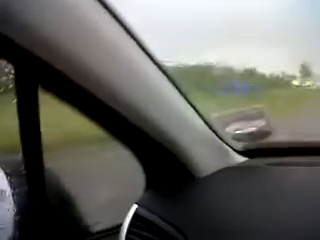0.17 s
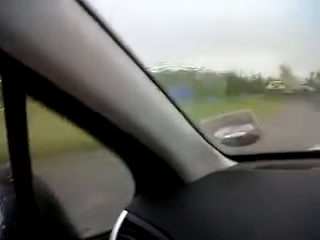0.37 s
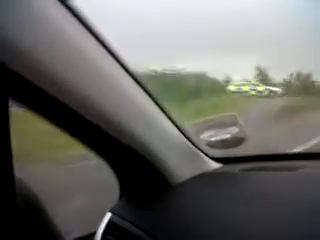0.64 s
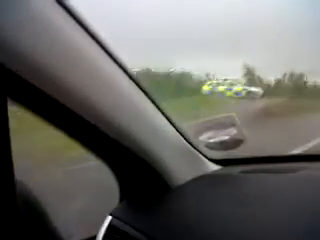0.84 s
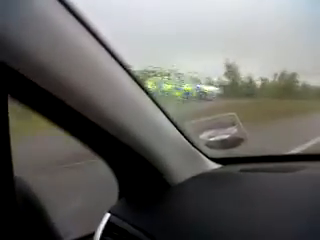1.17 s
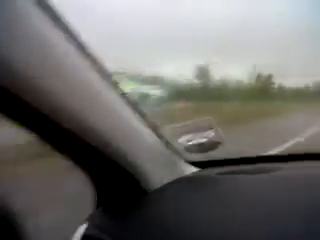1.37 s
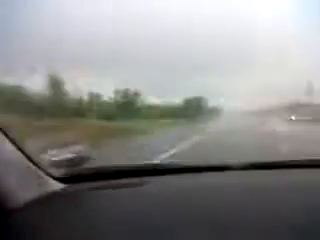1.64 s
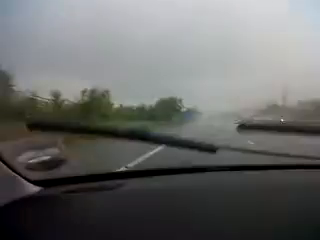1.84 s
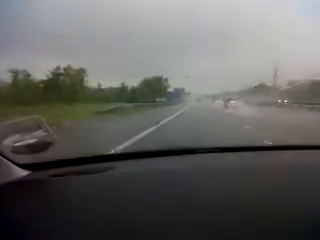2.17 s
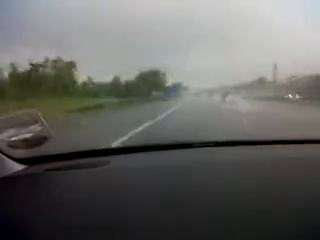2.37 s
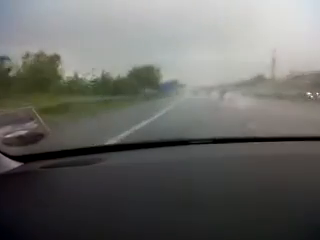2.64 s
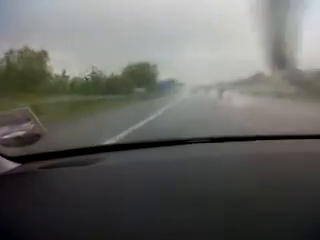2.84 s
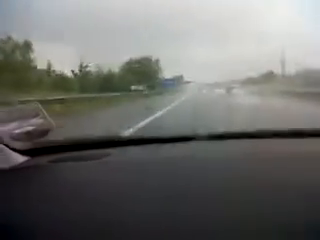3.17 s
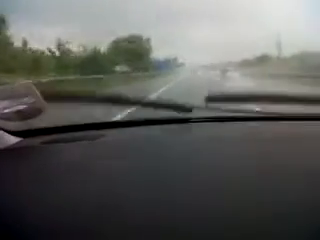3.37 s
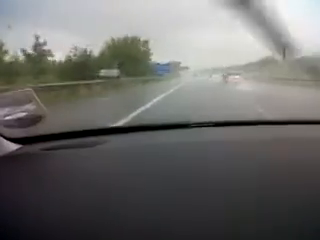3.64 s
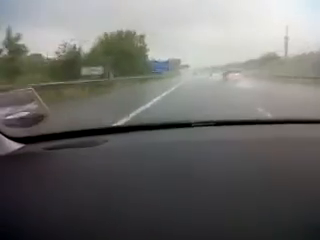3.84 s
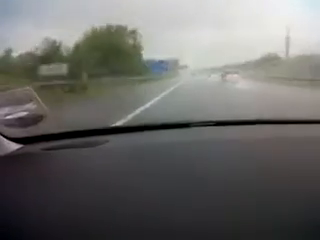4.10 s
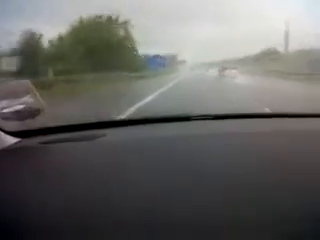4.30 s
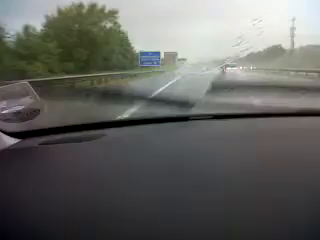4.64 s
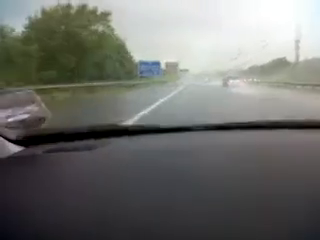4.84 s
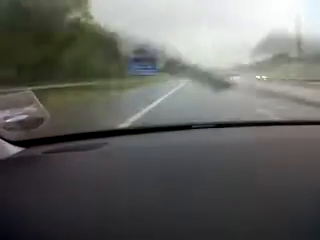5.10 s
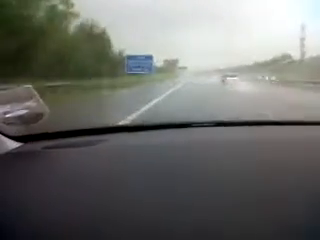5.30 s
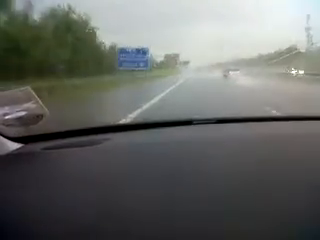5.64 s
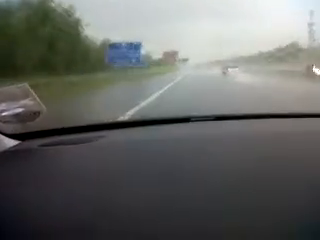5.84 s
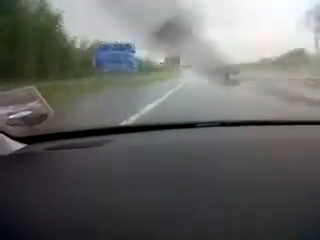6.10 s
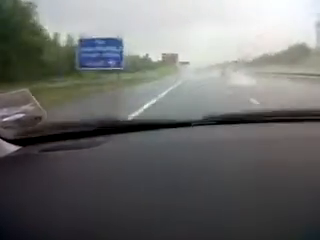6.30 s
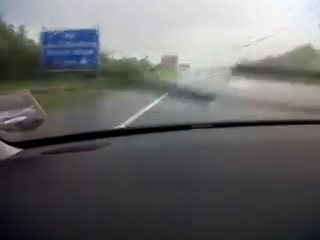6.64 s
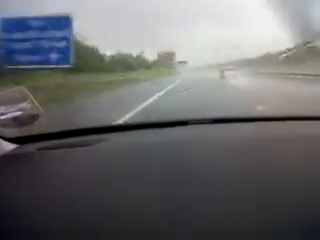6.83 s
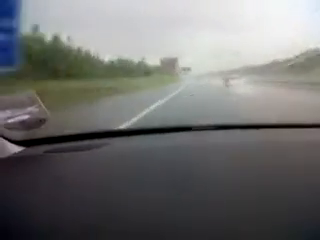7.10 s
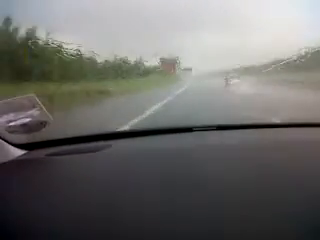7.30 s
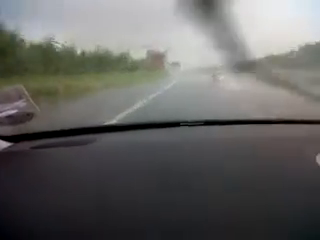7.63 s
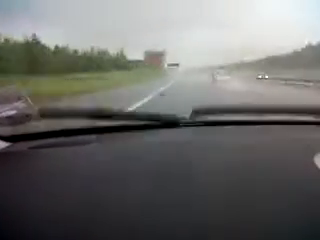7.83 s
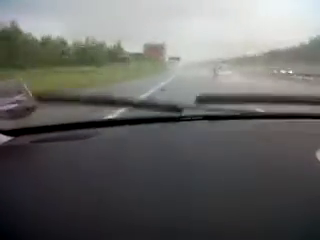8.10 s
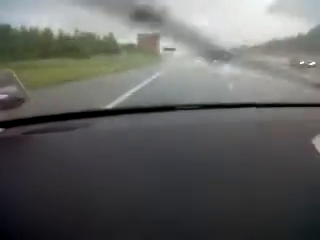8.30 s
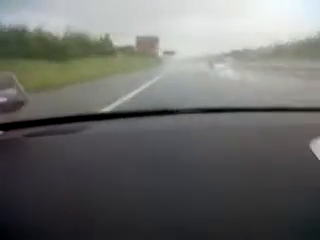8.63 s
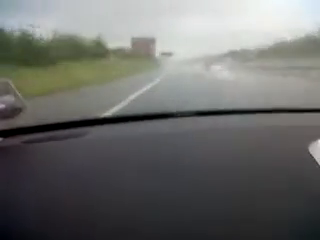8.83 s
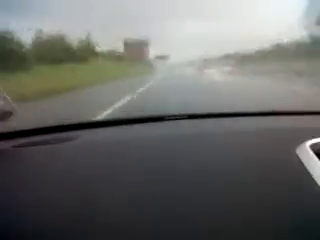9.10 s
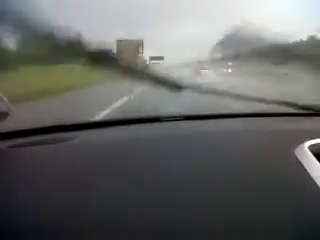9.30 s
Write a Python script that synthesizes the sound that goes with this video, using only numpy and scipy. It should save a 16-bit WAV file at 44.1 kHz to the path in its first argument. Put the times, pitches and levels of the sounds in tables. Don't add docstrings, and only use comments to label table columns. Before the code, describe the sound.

For about 9.5 seconds we sit inside a car driving steadily on a wet motorway. From 0 s a full, low tyre roar fills the small, padded cabin: deep body shake, rumble through the floor, and a broad mid-range rush of water flung into the wheel arches. A faint low engine hum lies underneath, creeping up very slightly in pitch. Dense rain ticks on the glass and thuds softly in the panels, fluttering in quick gusts. Short, soft low booms swell irregularly throughout, more noticeable near 4, 5.7 and 8.4 s. Fatter drops tap singly at about 0.9, 3.1 and 5.6 s, then more often from 6.2 s, one sharper at 7.4 s. Rain and spray strengthen gradually after 4.8 s, densest around 8.6 s. A tiny click comes at 9.3 s. The sound is dull and grainy, its treble breaking into watery blips, and ends without stopping.

```python
import sys
import numpy as np
from scipy import signal
from scipy.io import wavfile
from scipy.ndimage import uniform_filter1d

SR = 44100
rng = np.random.default_rng(int(sys.argv[2]) if len(sys.argv) > 2 else 0)


def put_to_file(sound):
    columns = np.atleast_2d(sound).T
    safe = np.clip(columns, -1, 1)
    whole_steps = np.round(safe * 32767)
    wavfile.write(sys.argv[1], SR, whole_steps.astype(np.int16))


def volts_from_db(level):
    exponent = np.asarray(level, float) / 20
    return 10 ** exponent


N = 417627

# start_s, level_db
ROAD_COARSENESS = [(0, -39.5), (1.0, -39), (1.7, -40.5), (2.2, -38.5), (2.8, -39.5), (3.1, -40), (4.6, -40),
                   (5.3, -38.5), (5.7, -39), (6.5, -38), (7.0, -38.5), (8.2, -37.5), (8.75, -38.5),
                   (9.2, -36.5), (9.47, -38)]
# pitch_hz, level_db (per Hz)
BODY_SHAKE = [(11, -26.5), (22, -15.5), (33, 4.5), (48, 2), (66, 2.5), (85, -2.5), (105, -44), (200, -120)]
# pitch_hz, level_db (per Hz)
TYRE_RUMBLE = [(70, -43.5), (90, -2.5), (108, -4), (125, -2.5), (138, -9), (155, -3), (185, -3.5),
               (200, -7.5), (215, -14.5), (260, -11.5), (340, -44.5), (600, -120)]
# pitch_hz, level_db (per Hz)
TREAD_ROAR = [(120, -28.5), (200, 3), (220, -5), (317, -2.5), (455, -2.5), (539, -8), (601, -11),
              (700, -8.5), (910, -29.5), (1540, -120)]
# pitch_hz, level_db (per Hz)
WHEEL_SPRAY = [(400, -29.5), (600, -6.5), (700, -5), (765, 2), (830, -1.5), (910, 1.5), (1020, -6),
               (1150, -2), (1290, -6), (1470, -5), (1800, -13.5), (2400, -24.5), (5000, -120)]
# start_s, level_db
RAIN_STRENGTH = [(0, -55.5), (.9, -54), (1.3, -56), (2.2, -55.5), (2.7, -54), (3.8, -54), (4.8, -52),
                 (5.3, -53.5), (6.3, -52.5), (7.2, -50.5), (7.65, -51.5), (8.1, -50), (8.37, -52),
                 (8.6, -48.5), (8.85, -50.5), (9.0, -50.5), (9.47, -51.5)]
# pitch_hz, level_db (per Hz)
GLASS_TICK = [(880, -29), (1500, -5), (2360, -18), (2650, -15), (3060, -8.3), (3450, -16.5), (3800, -17.5),
              (4620, -24.5), (5250, -31), (6000, -39.5), (6800, -43.5), (7050, -46), (7600, -51),
              (9000, -90)]
# start_s, level_db (peak)
FAT_DROPS = [(0.186, -45), (0.313, -40), (0.3468, -42), (0.8902, -37), (2.4498, -38), (3.1148, -35),
             (4.5845, -40), (4.8499, -40.5), (5.3251, -39), (5.6145, -36), (5.7069, -40.5), (5.7789, -39),
             (6.2226, -37.5), (6.269, -36.5), (6.4275, -36), (6.9137, -38.5), (7.0666, -38.5),
             (7.1551, -41.5), (7.223, -36), (7.3736, -38), (7.4239, -33), (7.5089, -39.5), (7.7366, -37),
             (7.9553, -38), (8.432, -39), (8.537, -35.5), (8.7998, -37.5), (9.2065, -35.5), (9.3628, -40)]
# centre_s, level_db (peak), pitch_hz, length_s
BUMPS = [(0.21, -35, 108.6, 0.067), (0.517, -33.9, 113.8, 0.079), (1.096, -34.5, 109.7, 0.206),
         (1.473, -32, 109, 0.082), (2.005, -33.5, 110.4, 0.11), (2.181, -31.5, 111.9, 0.099),
         (2.665, -36.5, 113.1, 0.132), (3.097, -36, 109.2, 0.129), (3.286, -33.0, 109.3, 0.068),
         (3.558, -37, 108.5, 0.122), (3.61, -34.5, 109.9, 0.2), (3.976, -29.5, 110.8, 0.066),
         (4.255, -33.5, 104.9, 0.166), (4.461, -36, 107.8, 0.1), (4.846, -35.0, 108.3, 0.071),
         (5.083, -33.5, 110.1, 0.15), (5.441, -33.5, 109.5, 0.059), (5.699, -31, 106.3, 0.11),
         (5.978, -37.5, 108.6, 0.068), (6.229, -34.0, 110, 0.062), (6.529, -36, 112.2, 0.098),
         (6.812, -35.5, 108.1, 0.077), (7.13, -33.5, 107.2, 0.102), (7.447, -34.5, 107.9, 0.095),
         (7.642, -34, 109.8, 0.136), (8.196, -34, 113, 0.068), (8.404, -30.4, 110.5, 0.073),
         (8.8, -32.5, 108.2, 0.175), (9.082, -32, 109.6, 0.099), (9.264, -36.5, 109.6, 0.132)]
BAND_EDGES = np.array([0, 4, 8, 12, 16, 20, 24, 28, 32, 40, 48, 60, 72, 88, 108, 128])
# pitch_hz, short_frame_db, long_frame_db
ROUNDING_STEPS = [(200, -16, -25), (1500, -11, -20), (1900, -8, -18), (2250, -5, -16), (3400, -4, -14),
                  (4100, 1.5, -12), (5000, 9, -10), (6100, 12, -9), (7400, 14, 14)]

ROAD_MID_DB, RAIN_MID_DB = -39, -53
GUST_DB, GUST_HZ, GUST_IN_SPRAY = 1.45, 26, 0.6
ENGINE_HZ, SPEED_UP_HZ_PER_S, ENGINE_DB = 75, 0.49, -45
CABIN_T60_S = 0.051
SPLAT_SAMPLES = 7
BOOM_REST_DB, BOOM_REST_HZ = -47.5, 108.2
LOW_SR, BLOCK, GRID = 16000, 128, 25
GLITCH_S, GLITCH_DB, GLITCH_DECAY_S = 9.32986, -31.5, 0.002
EDGE_HZ = 7700


def evened(x):
    return x / np.sqrt(np.mean(x ** 2) + 1e-20)


def read(points, hz, column=1):
    table = np.transpose(points)
    return np.interp(np.log(hz + 1), np.log(table[0] + 1), table[column])


def curves(rows):
    s, *columns = np.transpose(rows)
    return [np.interp(np.arange(N) / SR, s, c) for c in columns]


def drift(hz):
    lowpass = signal.butter(2, hz, fs=SR, output="sos")
    return evened(signal.sosfilt(lowpass, rng.standard_normal(N)))


def wash(spectrum, size, patchy_db, flicker_db):
    frames, hz = 4 * N // size + 5, np.fft.rfftfreq(size, 1 / SR)
    real, imag, patches = rng.standard_normal((frames, len(hz), 3)).T
    patches = uniform_filter1d(patches, size=size // 100, axis=0)
    patches = evened(uniform_filter1d(patches, size=6, axis=1))
    flicker = evened(uniform_filter1d(rng.standard_normal(frames), size=3))
    level_db = read(spectrum, hz)[:, None] + patchy_db * patches + flicker_db * flicker
    z = (real + 1j * imag) * volts_from_db(level_db)
    return evened(signal.istft(z, nperseg=size, noverlap=3 * size // 4)[1][:N])


def road(gust_db):
    coarse_db = curves(ROAD_COARSENESS)[0] - ROAD_MID_DB
    wet_db = curves(RAIN_STRENGTH)[0] - RAIN_MID_DB
    shake = wash(BODY_SHAKE, size=8192, patchy_db=-1.2, flicker_db=-0.2)
    rumble = wash(TYRE_RUMBLE, size=4096, patchy_db=-1.5, flicker_db=-0.27)
    roar = wash(TREAD_ROAR, size=1024, patchy_db=0.44, flicker_db=-1.0)
    spray = wash(WHEEL_SPRAY, size=1024, patchy_db=1.0, flicker_db=0.3)
    shake = volts_from_db(-46.5 + 0.58 * coarse_db) * shake
    rumble = volts_from_db(-37.5 + 1.4 * coarse_db) * rumble
    roar = volts_from_db(-39.0 + 0.39 * coarse_db + 0.25 * wet_db) * roar
    spray = volts_from_db(-39.5 + 0.72 * wet_db + GUST_IN_SPRAY * gust_db) * spray
    return shake + rumble + roar + spray


def hum(hz, db, wobble_hz, wobble_rate_hz, tremble_db):
    turns = np.cumsum(hz + wobble_hz * drift(wobble_rate_hz)) / SR
    return volts_from_db(db + tremble_db * drift(4.7)) * np.sqrt(2) * np.sin(2 * np.pi * turns)


def engine():
    hz = ENGINE_HZ + SPEED_UP_HZ_PER_S * np.arange(N) / SR
    return hum(hz, ENGINE_DB, wobble_hz=2.5, wobble_rate_hz=5, tremble_db=3.0)


def struck(spectrum):
    hz = abs(np.fft.fftfreq(8192, 1 / SR))
    log_gain = np.log(volts_from_db(np.maximum(read(spectrum, hz), -90)))
    response = np.fft.ifft(np.exp(np.conj(signal.hilbert(log_gain)))).real[:2048]
    return response / np.linalg.norm(response)


def cabin(ticks):
    keep = 10 ** (-6 / (CABIN_T60_S * SR))
    energy = signal.lfilter([1 - keep], [1, -keep], ticks ** 2)
    return np.sqrt(energy) * rng.standard_normal(N)


def rain(gust_db):
    level_db = curves(RAIN_STRENGTH)[0] + gust_db
    drops_per_s = 1500 * volts_from_db(3 * drift(35))
    size = volts_from_db(3.2 * np.minimum(rng.exponential(1, N), 5)) * rng.choice([-1., 1.], N)
    patter = evened(size * (rng.random(N) < drops_per_s / SR))
    fizz = rng.standard_normal(N)
    ticks = volts_from_db(level_db) * (0.71 * patter + 0.52 * fizz)
    tick, thud = struck(GLASS_TICK), struck(WHEEL_SPRAY)
    for start_s, peak_db in FAT_DROPS:
        splat = np.hanning(SPLAT_SAMPLES) / abs(tick).max()
        ticks[round(start_s * SR):][:SPLAT_SAMPLES] += volts_from_db(peak_db - 6.5) * splat
    heard = volts_from_db(-2.0) * ticks + volts_from_db(-1.0) * cabin(ticks)
    return signal.oaconvolve(heard, volts_from_db(2.0) * tick + volts_from_db(-5.5) * thud)[:N]


def boom():
    t = np.arange(0, N + 200, 100) / SR
    centre_s, peak_db, hz, length_s = np.transpose(BUMPS)[:, :, None]
    swells = volts_from_db(peak_db - 3.0 - 21 * ((t - centre_s) / length_s) ** 2)
    rest = volts_from_db(BOOM_REST_DB)
    total = swells.sum(0) + rest
    pitch_hz = ((swells * hz).sum(0) + rest * BOOM_REST_HZ) / total
    pitch_hz, level_db = curves(np.transpose([t, pitch_hz, 20 * np.log10(total)]))
    return hum(pitch_hz, level_db, wobble_hz=5.5, wobble_rate_hz=14, tremble_db=1.3)


def scene():
    gust_db = GUST_DB * drift(GUST_HZ)
    return (road(gust_db) + engine() + rain(gust_db) + boom())[None]


def band_limit(x):
    edge = signal.firwin(301, EDGE_HZ, window=("kaiser", 9), fs=SR)
    return signal.oaconvolve(np.pad(x, 150, "reflect"), edge, "valid")


def block_rounding(x):
    low = signal.resample_poly(x, LOW_SR // 100, SR // 100)
    low = np.pad(low, (8 * BLOCK - GRID, 24 * BLOCK), "reflect")
    n, k = np.arange(2 * BLOCK)[:, None], np.arange(BLOCK)
    window = np.sin(np.pi * (n + 0.5) / (2 * BLOCK))
    basis = window * np.cos(np.pi / BLOCK * (n + 0.5 + BLOCK / 2) * (k + 0.5)) * np.sqrt(2 / BLOCK)
    length = (len(low) // BLOCK - 6) // 8 * 8 * BLOCK - 7 * BLOCK
    halves = low[6 * BLOCK:][:length].reshape(-1, BLOCK)
    z = (np.hstack([halves[:-1], halves[1:]]) @ basis).reshape(-1, 8, BLOCK)

    width = np.diff(BAND_EDGES)
    power = np.add.reduceat((z ** 2).mean(1), BAND_EDGES[:-1], axis=1) / width
    power = power ** 0.65 * power.mean(0) ** 0.35
    hz = (BAND_EDGES[1:] + BAND_EDGES[:-1]) * LOW_SR / 4 / BLOCK
    short = (np.arange(len(z)) % 2 == 1)[:, None]
    step_db = np.where(short, read(ROUNDING_STEPS, hz), read(ROUNDING_STEPS, hz, column=2))
    step_db = step_db + rng.standard_normal(power.shape)
    step = np.repeat(np.sqrt(power + 1e-20) * volts_from_db(step_db), width, axis=1)[:, None]
    z = np.sign(z) * step * np.floor((abs(z) / step) ** 0.75 + 0.4054) ** (4 / 3)

    parts = z.reshape(-1, BLOCK) @ basis.T
    first = np.pad(parts[:, :BLOCK], ((0, 1), (0, 0)))
    second = np.pad(parts[:, BLOCK:], ((1, 0), (0, 0)))
    joined = (first + second).ravel()[2 * BLOCK - GRID:]
    return signal.resample_poly(joined, SR // 100, LOW_SR // 100, window=("kaiser", 14))[:N]


def glitch():
    since_s = np.arange(N) / SR - GLITCH_S
    return volts_from_db(GLITCH_DB) * (since_s > 0) * np.exp(-abs(since_s) / GLITCH_DECAY_S)


def roll_off(x):
    return signal.sosfilt(signal.butter(12, 15900, fs=SR, output="sos"), x)


def record(dry):
    x = block_rounding(band_limit(dry[0]))
    x = band_limit(x) + glitch()
    return roll_off(x[None])


dry = scene()
out = record(dry)
put_to_file(out)
```